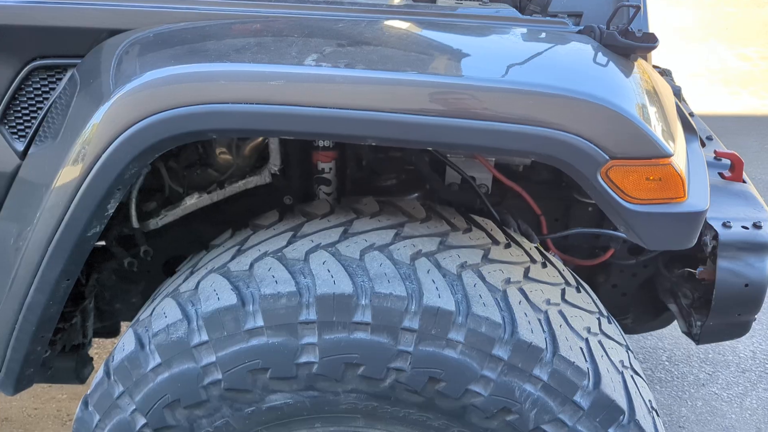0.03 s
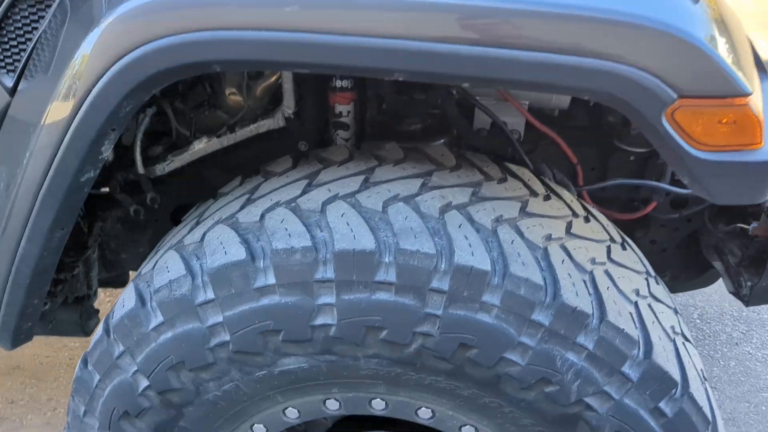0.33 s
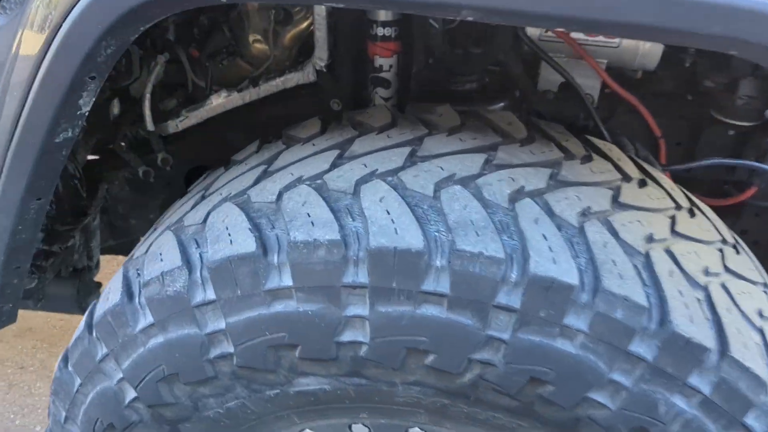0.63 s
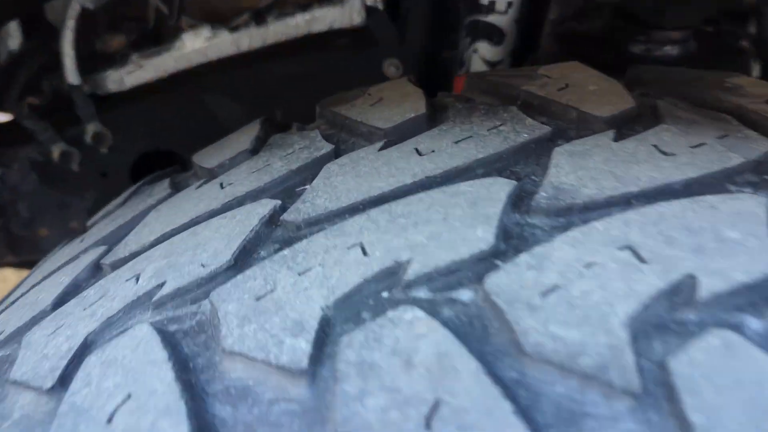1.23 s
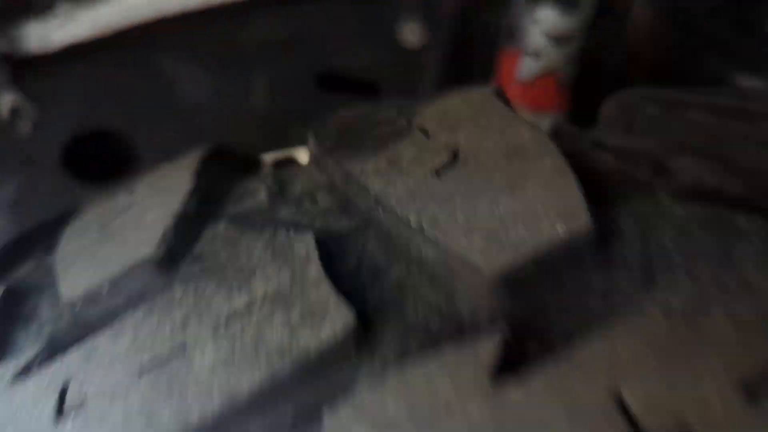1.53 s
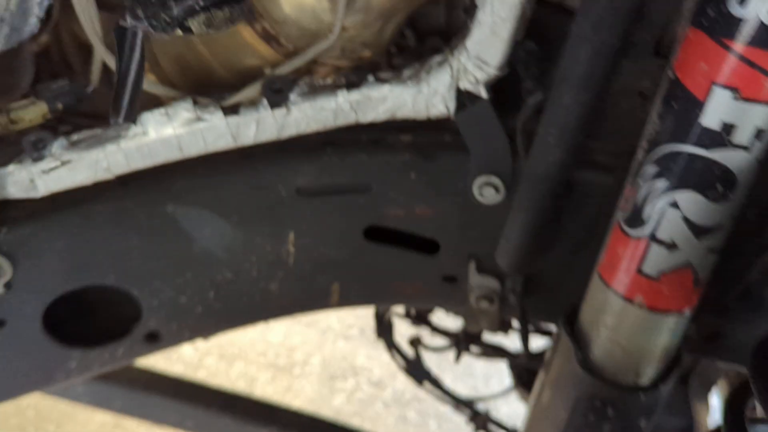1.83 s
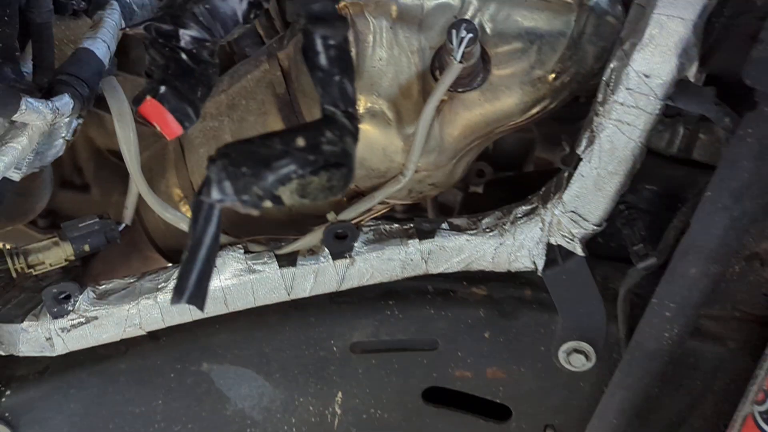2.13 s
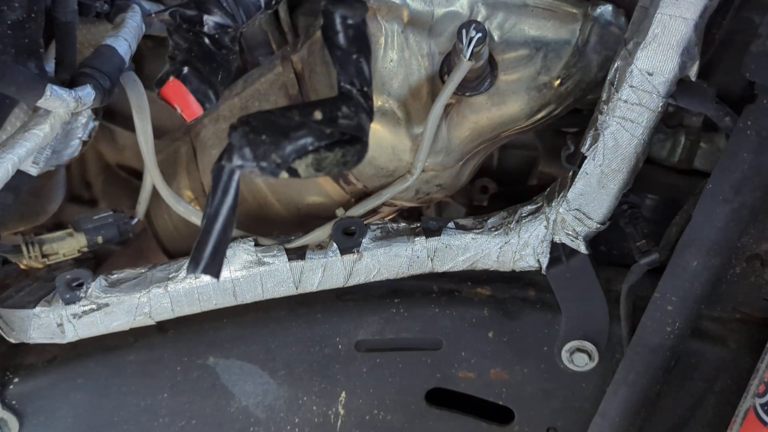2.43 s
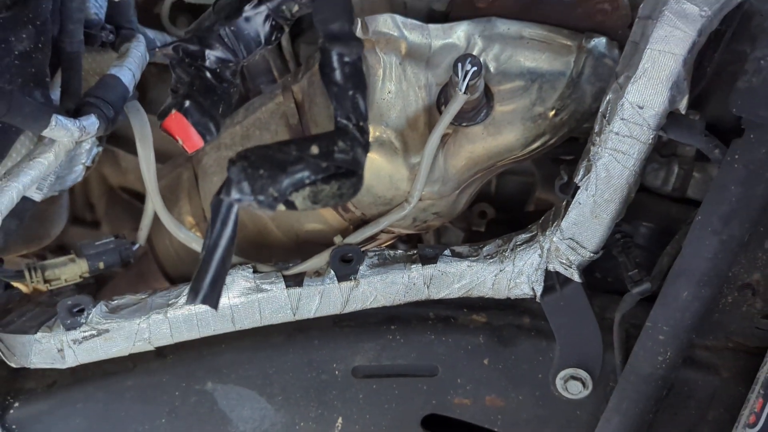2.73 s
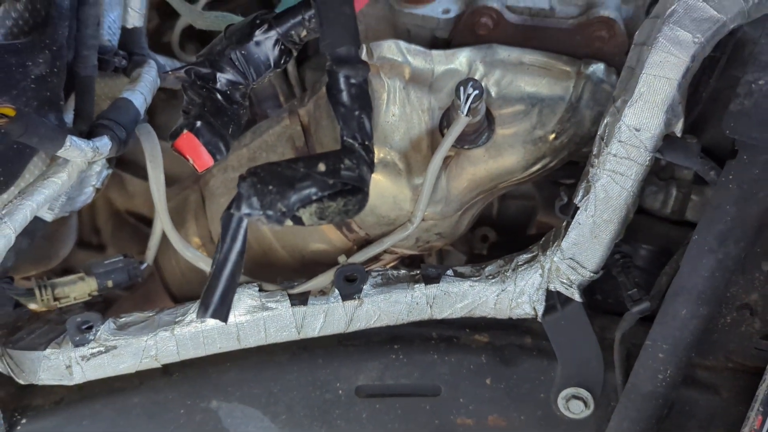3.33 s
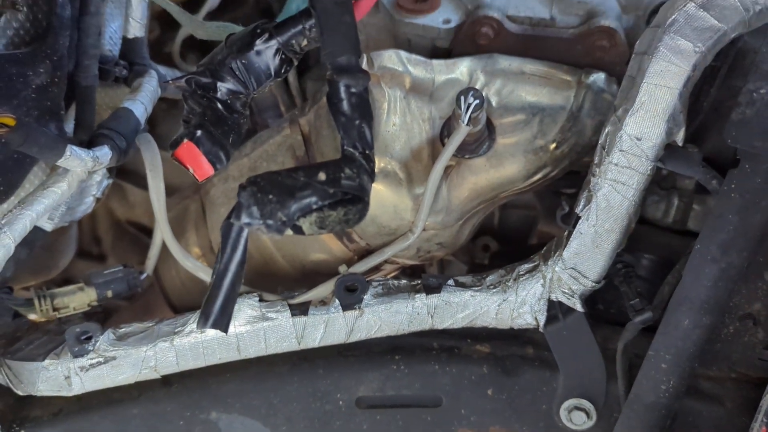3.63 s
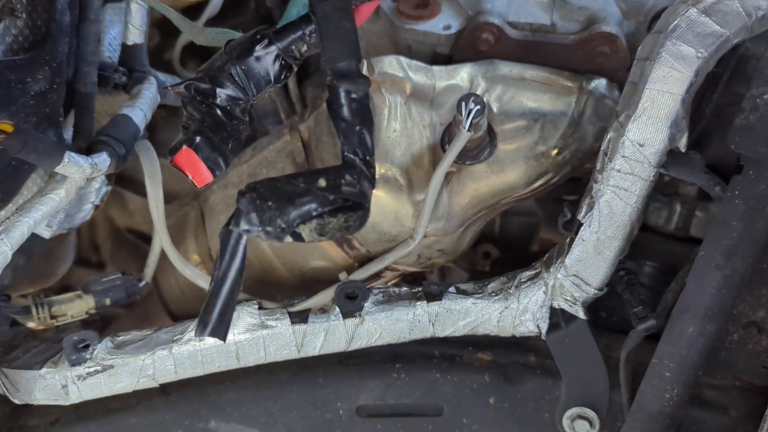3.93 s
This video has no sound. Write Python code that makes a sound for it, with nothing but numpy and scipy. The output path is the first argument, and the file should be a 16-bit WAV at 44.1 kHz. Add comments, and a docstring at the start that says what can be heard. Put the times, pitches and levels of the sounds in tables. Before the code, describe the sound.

A vehicle engine idles throughout with rapid, regular knocking and ticking over a lumpy exhaust throb. It starts slightly muffled, with a soft hiss fading by 1 second and a faint rising swish around 0.7. Two faint squeaks come near 0.3 seconds and two more near 1.4. As the microphone enters the wheel well, the metallic clatter grows louder and brighter, staying close from about 2 seconds until 4.

```python
"""A knocking six-cylinder idle over a lumpy exhaust throb, heard at first from beside the front tyre.
Three times in each engine cycle a bout of knocks and fine metallic clatter rings the engine bay.
An airy hiss and a short rising swish pass early on, and the engine gives four faint squeaks.
As the microphone moves over the tyre into the wheel well, the engine comes into the open
and the clatter grows louder and brighter."""
import sys
import numpy as np
from scipy import signal
from scipy.fft import rfft, irfft, next_fast_len
from scipy.io import wavfile
from scipy.ndimage import map_coordinates

SR = 44100
rng = np.random.default_rng(int(sys.argv[2]) if len(sys.argv) > 2 else 0)


def waveform_to_disk(signal):
    """Save audio, clipped to [-1, 1], as 16-bit WAV at the path in sys.argv[1]."""
    frames = np.transpose(np.atleast_2d(signal))
    scaled = np.clip(frames, -1, 1) * 32767
    samples = np.round(scaled).astype(np.int16)
    wavfile.write(sys.argv[1], SR, samples)


N = 176400
T = np.arange(N) / SR
CYCLE_HZ = 5.0733  # one cycle is six firings
# Layer faders, ahead of the level rides below.
KNOCK_DB, RING_DB, RATTLE_DB, FENDER_DB, TICK_DB, FIZZ_DB = -27, -26.5, -28.5, -30.5, -29.5, -28.5
RUMBLE_DB, TONES_DB = -23, -22

# The hunting idle. Each row: time in seconds, crank lag behind steady running in ms.
CRANK_LAG = [(0, 6), (.3, 5.5), (.69, -6.5), (.89, -5), (1.1, 0), (2.07, 1.5), (2.35, -2.5), (2.86, 4),
             (3.22, -5.5), (3.65, 6.5), (4, -0.5)]
# The knock pattern. Each row: place in the cycle in ms, level in dB.
KNOCK_PATTERN = [(3, -20.5), (39.5, -8.5), (43.5, -5), (49, 2), (57.5, -6), (62.5, -8.5), (70, -6),
                 (101.5, -3.5), (109, -13.5), (114, -4.5), (120, -12.5), (127.5, -6.5), (134, -4),
                 (171, -10), (175.5, -9), (181, -13), (188, -9.5), (194, -2.5)]
# Swells of clatter, overlapping into three bouts. Each row: centre in the cycle in ms,
# half width in ms, then rattle, tick and fizz levels in dB.
CLATTER_SWELLS = [(33.1, 7.4, 0, 12.5, -23), (59.1, 16.2, 2, 2.5, 6), (116.5, 19.6, 3, 12, 6),
                  (173.8, 12.6, 0, 14.5, 4.5), (186.3, 21.2, 4.5, 1.5, 0.5)]
# Level rides of the approach. Each row: time in seconds, then gains in dB for knocks with rattle,
# ticks, fizz, ringing metal and rattle through the fender.
APPROACH = [(0, -22.5, -7.5, -24.5, -17, -5), (.4, -15, -8.5, -20, -21, -6.5),
            (.8, -12.5, -15.5, -16.5, -19, -8), (1.1, -7.5, -11.5, -12, -19, -4),
            (1.4, -5.5, -8, -7.5, -16, 1), (1.65, -0.5, -7.5, -3.5, -6.5, 4), (2.2, -0.5, 1, -0.5, -1.5, 1),
            (3.5, 0.5, 2, 0.5, -1.5, -1), (4, 0, 1.5, 3.5, 2, 3.5)]
# Pan of knocks and rattle. Each row: time in seconds, left minus right in dB.
KNOCK_PAN = [(0, 9), (.7, 1.5), (1.2, -3), (1.7, -3), (2.3, -2.5), (4, -4)]
# The wheel well's stereo lean. Each row: frequency in Hz, left minus right in dB.
WELL_LEAN = [(100, 2.5), (290, 0.5), (370, 4.5), (470, 8.5), (610, -6), (850, 0), (1400, -5), (1900, -4),
             (2700, 4), (5000, 2), (9000, -2.5), (11200, -0.5), (12500, -1.5), (16000, 6)]
# Block, manifold and heat shield. Each row: pitch in Hz, level in dB, time to fall 60 dB in seconds.
METAL_MODES = [(431.5, -11, 0.14), (708, 0, 0.17), (835, -2, 0.13), (949, -2.5, 0.15), (1034, 4, .05),
               (1155, 0, 0.077), (1418, -1.5, 0.11), (1486, 0, 0.063), (1702, -5, 0.12), (2052, 4.5, 0.086),
               (2214, -18, 0.094), (2460, -15, 0.06), (3176, -4.5, 0.061), (3290, -7.5, 0.095)]
# EQ curves of the layers. Each row: frequency in Hz, relative gain in dB.
KNOCK_EQ = [(150, -44), (400, -17.5), (590, -25.5), (760, -22), (1200, 3.5), (1550, 2.5), (2150, -3),
            (2700, -6), (3800, -21.5), (5000, -14.5), (9000, -22.5), (16000, -59)]
RATTLE_EQ = [(150, 6), (300, 1), (440, 2), (570, -3.5), (800, 7), (1300, 3.5), (2100, -3.5), (2800, -17),
             (3800, -25), (8000, -29)]
FENDER_EQ = [(200, -10), (330, -9), (440, -3.5), (600, -9), (850, -20.5), (1200, 5.5), (1550, 1.5),
             (2000, -4.5), (2650, -3), (3300, -8.5), (3900, -11.5), (8000, -45)]
TICK_EQ = [(800, -25), (2000, 13.5), (2700, 5.5), (3300, 7), (3650, 2.5), (3900, 7), (4130, -8.5),
           (4400, 2.5), (5200, 2), (6000, -1.5), (7300, -16.5), (9000, -12.5), (10500, -19), (16000, -28)]
FIZZ_EQ = [(3000, -30), (6000, -9.5), (8700, -6), (9800, -11), (10900, -5.5), (11150, 0), (11450, 1),
           (12000, -4), (12500, 0), (13100, -2.5), (13900, -6.5), (15800, -16.5)]
RUMBLE_EQ = [(15, -44), (29, -32), (40, -25), (52, -4), (62, 0), (73, -12), (83, -7), (95, -4), (109, -15),
             (126, -7.5), (149, -15), (168, -8.5), (190, -13.5), (215, -12), (245, -21), (285, -19.5),
             (350, -30), (700, -33.5), (3000, -53)]
AIR_EQ = [(800, -23), (2700, 5.5), (4800, -1), (5800, -22), (16000, -35)]
# Exhaust tones. Each entry: a multiple of the cycle rate, and in the second list its level in dB.
EXHAUST_ORDERS = [9, 11, 12, 13, 15, 17, 18, 19, 20, 21, 24, 26, 33, 35, 42]
EXHAUST_ORDER_DB = [-5, -3.5, 1.5, -10.5, -2.5, -12, -0.5, -1.5, -9, -5.5, -8.5, -13, -10.5, -9.5, -15.5]
# Level rides of the exhaust and the airy hiss. Each row: time in seconds, gain in dB.
EXHAUST_RIDE = [(0, -9.5), (.19, -1.5), (.36, -5.5), (.6, -4), (1.1, -6.5), (1.6, -3.5), (1.9, -2),
                (2.22, 1), (2.65, -1.5), (3, 3.5), (3.45, -0.5), (3.7, 0.5), (3.95, 3.5)]
AIR_RIDE = [(0, -42), (.3, -41), (.55, -41), (.8, -49), (1.2, -72)]
# The squeaks. Each row: peak time in seconds, pitch in Hz, level in dB.
SQUEAK_CUES = [(.19, 3150, -33.5), (.32, 3200, -34.5), (1.34, 3420, -32.5), (1.535, 3410, -35.5)]
# The swish. Each row: time in seconds, band centre in Hz, level in dB.
SWISH_SWEEP = [(.4, 6500, -58), (.57, 7500, -43), (.64, 8200, -46), (.7, 9000, -40), (.72, 10800, -38),
               (.755, 12000, -64)]


def amp(db):
    """Decibels to gain."""
    return 10 ** (np.asarray(db) / 20)


def unit(x):
    """Scales to rms 1."""
    return x / np.sqrt(np.mean(x ** 2) + 1e-20)


def curve(rows, column=1):
    """One column of a table, joined by lines over time."""
    rows = np.array(rows, float)
    return np.interp(T, rows[:, 0], rows[:, column])


def colour(x, eq):
    """Gives a stereo sound an EQ and the lean of the wheel well, at rms 1."""
    size = next_fast_len(N + SR // 2)
    log_hz = np.log(np.fft.rfftfreq(size, 1 / SR) + 1)
    shape, lean = (np.interp(log_hz, np.log(p[:, 0]), p[:, 1]) for p in map(np.array, (eq, WELL_LEAN)))
    gain = amp(shape + np.outer([.5, -.5], lean))
    return unit(irfft(rfft(x, size) * gain, size)[:, :N])


def wander(rate_hz):
    """A smooth random drift of rms 1."""
    knots = rng.standard_normal(400)
    return unit(map_coordinates(knots, [T[::50] * rate_hz + 2], mode="wrap").repeat(50)[:N])


def band(centre_hz, half_width_hz):
    """Stereo noise in a band that can move."""
    lowpass = signal.butter(2, half_width_hz, fs=SR, output="sos")
    low = signal.sosfilt(lowpass, rng.standard_normal((2, N)))
    return unit(low * np.cos(2 * np.pi * np.cumsum(centre_hz) / SR))


def cycles(ms):
    """Milliseconds as a share of the engine cycle."""
    return ms / 1000 * CYCLE_HZ


def crank():
    """Engine cycles turned so far, dragging and rushing as the idle hunts."""
    return (T - curve(CRANK_LAG) / 1000) * CYCLE_HZ


def engine_bay(x, t60, direct, build_s=0.00089):
    """The direct sound and a short thicket of reflections, different at each side."""
    t = np.arange(SR // 10) / SR
    tail = rng.standard_normal((2, len(t))) * amp(-60 * t / t60) * (1 - np.exp(-t / build_s))
    tail /= np.linalg.norm(tail, axis=1, keepdims=True)
    tail[:, 0] += direct
    return signal.oaconvolve(np.atleast_2d(x), tail, axes=1)[:, :N]


def knocks(turns, jitter_ms=0.8, spread_db=0.5):
    """Each knock returns every cycle, a little uneven, by its own path: bare blows and their thud."""
    count = np.arange(int(turns[-1]) + 1)
    blows, thud = np.zeros(N), np.zeros((2, N))
    for ms, db in KNOCK_PATTERN:
        late, strong = rng.standard_normal((len(count), 2)).T
        at = np.searchsorted(turns, count + cycles(ms + jitter_ms * late))
        train = np.bincount(at, amp(db + spread_db * strong), N + 1)[:N]
        blows += train
        thud += engine_bay(train, t60=0.059, direct=0.21, build_s=0.0016)
    return blows, colour(thud, KNOCK_EQ)


def clatter(turns, column, floor_db, per_s, hit_spread_db, swell_spread_db, t60, direct):
    """Tiny impacts, per_s on each of six paths, that swell in each bout and never quite stop."""
    power = np.full(N, amp(floor_db) ** 2)
    for swell in CLATTER_SWELLS:
        place = turns - cycles(swell[0])
        nearest = np.round(place).astype(int)
        strength = amp(swell[column] + swell_spread_db * rng.standard_normal(32))[nearest]
        power += strength ** 2 * np.exp(-((place - nearest) / cycles(swell[1])) ** 2)
    out = np.zeros((2, N))
    for _ in range(6):
        struck = rng.random(N) < per_s / SR
        force = amp(hit_spread_db * np.clip(rng.standard_normal(N), -2, 2))
        hits = struck * force * rng.choice([-1, 1], N)
        out += engine_bay(hits * np.sqrt(power), t60, direct)
    return out


def through_fender(rattle):
    """The rattle, smeared and coloured on its way through the fender."""
    return colour(engine_bay(rattle, t60=0.023, direct=0.19), FENDER_EQ)


def ringing_metal(strikes, apart_hz=2200):
    """Struck engine metal rings; the higher a mode, the further its phase can part between the sides."""
    t = np.arange(SR // 6) / SR
    tail = np.zeros((2, len(t)))
    for hz, db, t60 in METAL_MODES:
        phase = hz * t + rng.random() + rng.random((2, 1)) * hz / apart_hz
        tail += amp(db - 60 * t / t60) / np.sqrt(t60) * np.sin(2 * np.pi * phase)
    attack = 1 - np.exp(-t / .001)
    rung = signal.oaconvolve(np.atleast_2d(strikes), tail * attack, axes=1)[:, :N]
    return colour(rung, eq=[(100, -20), (400, -4), (4500, -2.5), (8000, -15)])


def airy_hiss():
    """Soft hiss beside the vehicle that fades away in about a second."""
    return colour(rng.standard_normal((2, N)), AIR_EQ) * amp(curve(AIR_RIDE))


def exhaust(turns, waver=0.18, slip=0.07, puff_depth=0.34, side_db=-19):
    """Wavering low engine orders and a rough puff of gas at each firing."""
    tones = np.zeros(N)
    for order, db in zip(EXHAUST_ORDERS, EXHAUST_ORDER_DB):
        level = amp(db) * (1 + waver * wander(3.91))
        phase = order * turns + rng.random() + slip * wander(3.24)
        tones += level * np.sin(2 * np.pi * phase)
    firing = np.cos(2 * np.pi * 6 * turns)
    mid, side = rng.standard_normal((2, N)) * (1 + puff_depth * firing)
    gas = colour(mid + amp(side_db) * np.outer([1, -1], side), RUMBLE_EQ)
    return (amp(TONES_DB) * unit(tones) + amp(RUMBLE_DB) * gas) * amp(curve(EXHAUST_RIDE))


def squeaks(half_width_s=0.02):
    """Short fuzzy whistles, perhaps from the belt."""
    blips = sum(amp(db) * np.exp(-((T - s) / half_width_s) ** 2) for s, _, db in SQUEAK_CUES)
    return band(curve(SQUEAK_CUES), half_width_hz=126) * blips


def swish():
    """A faint band of hiss that climbs and drops out of earshot."""
    return band(curve(SWISH_SWEEP), half_width_hz=1400) * amp(curve(SWISH_SWEEP, column=2))


def scene():
    """Knocks, three registers of clatter and the exhaust follow one crank; hiss and squeaks sit on top."""
    turns = crank()
    blows, thud = knocks(turns)
    rattle = clatter(turns, column=2, floor_db=-2, per_s=250,
                     hit_spread_db=3, swell_spread_db=1.5, t60=0.039, direct=0.87)
    ticks = clatter(turns, column=3, floor_db=3, per_s=500,
                    hit_spread_db=5, swell_spread_db=0.93, t60=0.016, direct=0.21)
    fizz = clatter(turns, column=4, floor_db=2.5, per_s=450,
                   hit_spread_db=2, swell_spread_db=2.63, t60=0.026, direct=0.25)
    knocking = amp(KNOCK_DB) * thud + amp(RATTLE_DB) * colour(rattle, RATTLE_EQ)
    knocking *= amp(curve(APPROACH))
    fender = amp(FENDER_DB + curve(APPROACH, column=5)) * through_fender(rattle)
    strikes = unit(blows) + amp(-2) * unit(rattle[0])
    metal = amp(RING_DB + curve(APPROACH, column=4)) * ringing_metal(strikes)
    treble = amp(TICK_DB + curve(APPROACH, column=2)) * colour(ticks, TICK_EQ)
    treble += amp(FIZZ_DB + curve(APPROACH, column=3)) * colour(fizz, FIZZ_EQ)
    pan = amp(np.outer([.5, -.5], curve(KNOCK_PAN)))
    engine = (knocking + fender) * pan + metal + treble
    return engine + airy_hiss() + exhaust(turns) + squeaks() + swish()


def record(dry):
    """A blink of silence, a fast fade-in and a steep cut of the highest treble."""
    start_s, fade_s, cutoff_hz = 0.044, 0.014, 15950
    opened = dry * np.clip((T - start_s) / fade_s, 0, 1)
    lowpass = signal.firwin(1023, cutoff_hz, window=("kaiser", 9), fs=SR)
    return signal.oaconvolve(opened, lowpass[None], "same")


dry = scene()
out = record(dry)
waveform_to_disk(out)
```